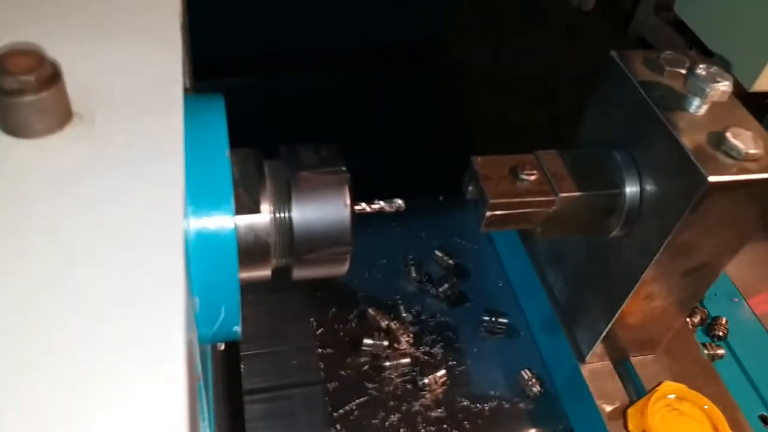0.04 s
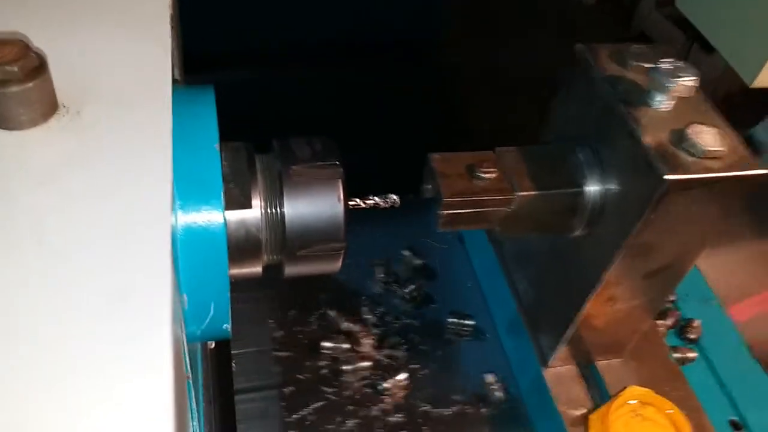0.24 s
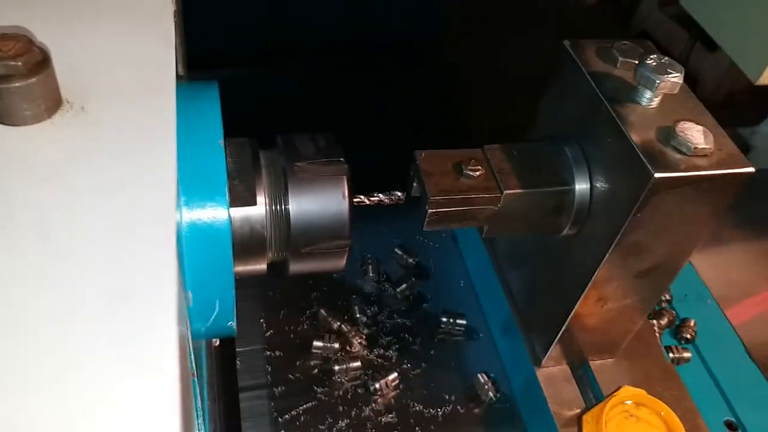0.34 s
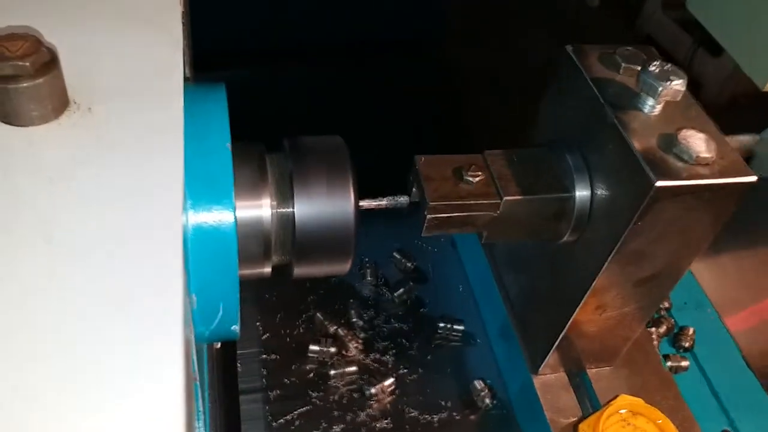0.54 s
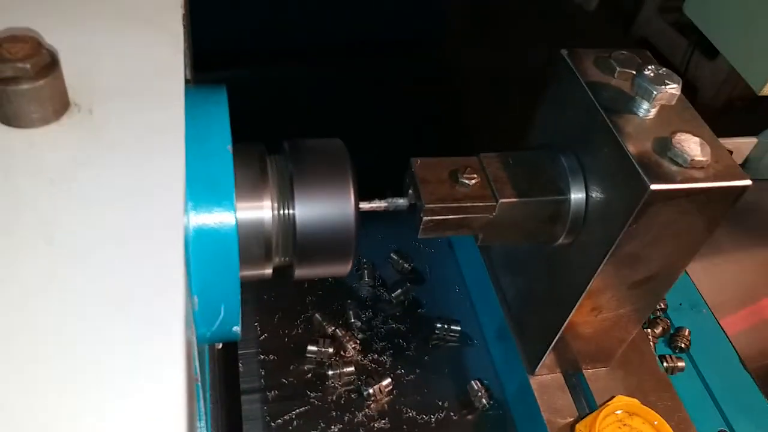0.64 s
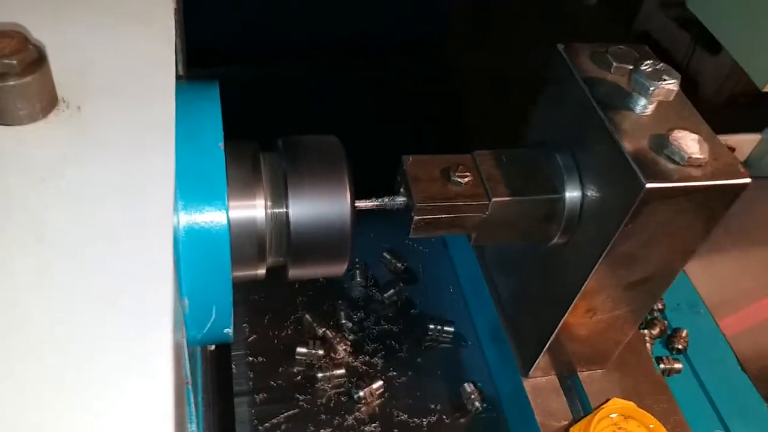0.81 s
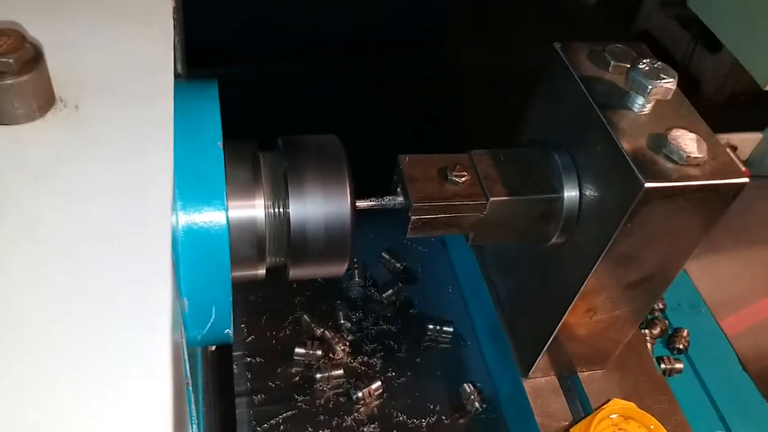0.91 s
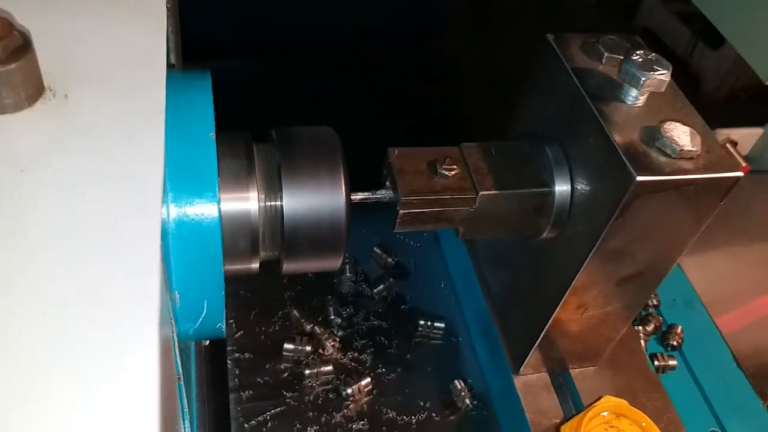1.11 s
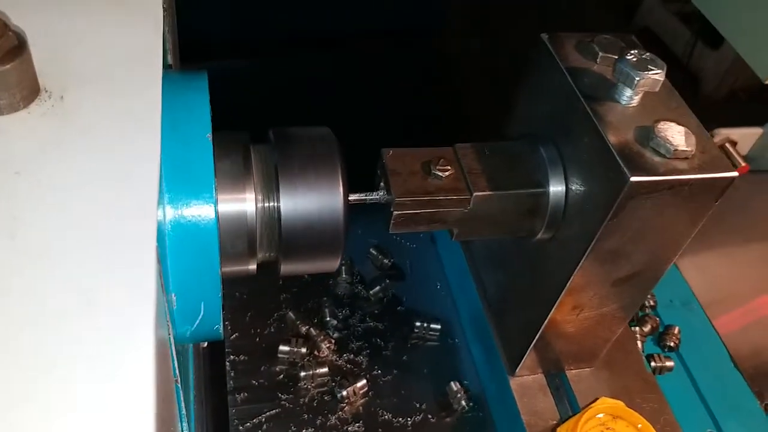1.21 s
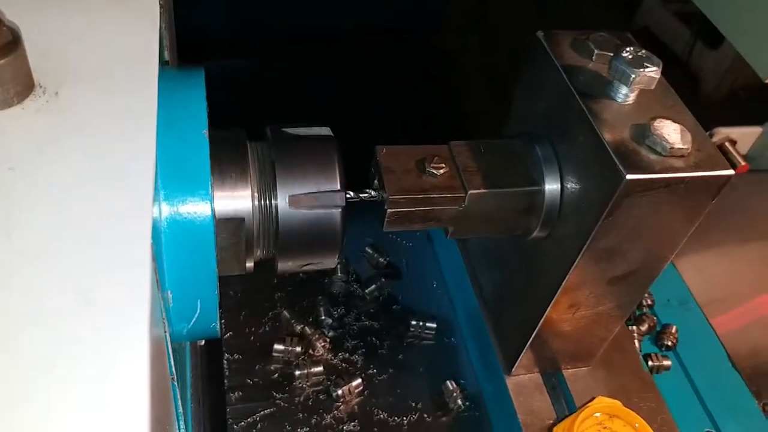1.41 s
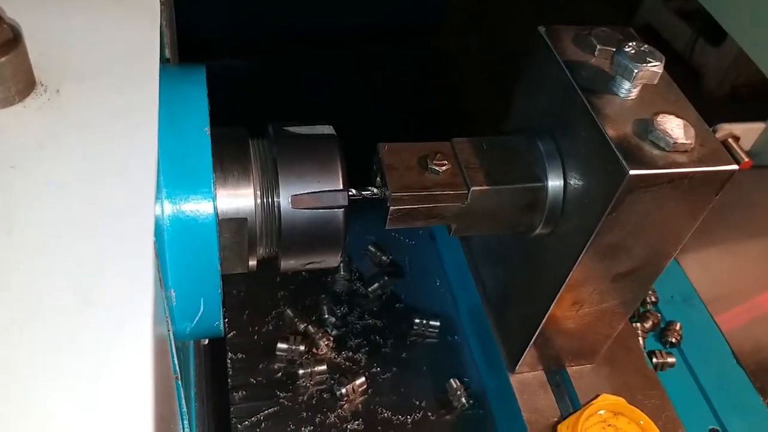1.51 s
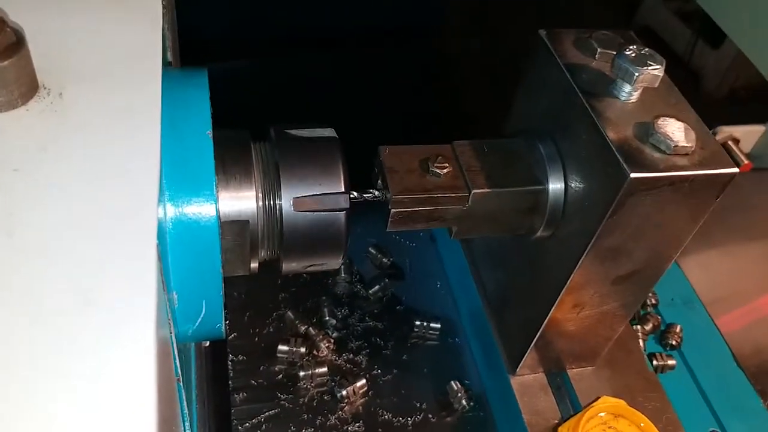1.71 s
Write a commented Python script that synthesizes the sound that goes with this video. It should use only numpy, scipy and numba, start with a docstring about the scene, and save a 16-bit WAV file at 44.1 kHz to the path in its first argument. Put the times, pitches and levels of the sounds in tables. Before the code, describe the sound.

A threading machine's spindle whirs up and brakes after a short motor hum.

```python
"""Tapping machine in a workshop

Close up on a small machine, from a spaced pair of microphones. A stepper motor sings as it slides the
workpiece up to the tap; then the belt-driven spindle spins up, runs for most of a second with a throbbing
tooth tone and brakes. Its servo drive whines on the left; the room rings on over a steady machine hum."""
import sys
import numpy as np
from scipy import signal
from scipy.fft import rfft, irfft
from scipy.io import wavfile
from numba import njit

SR = 44100
rng = np.random.default_rng(int(sys.argv[2]) if len(sys.argv) > 2 else 0)


def master(y):
    """Save y as 16-bit WAV."""
    cut = np.clip(np.atleast_2d(y).T, -1, 1)
    pcm = np.round(cut * 32767)  # scale
    wavfile.write(sys.argv[1], SR, pcm.astype(np.int16))


N = 77175
T = np.arange(N) / SR


def undb(db):
    return 10 ** (np.asarray(db) / 20)


def curve(table, column=1):
    """One column of a table, joined by straight lines in time."""
    rows = np.array(table)
    return np.interp(T, rows[:, 0], rows[:, column])


def unit(x):
    return x / np.sqrt(np.mean(x ** 2))


def swell(at_s, width_s):
    return np.exp(-((T - at_s) / width_s) ** 2)


def gains(table):
    """A (Hz, dB) table as gains on the frequency grid."""
    hz, db = np.array(table).T
    return undb(np.interp(np.log(np.fft.rfftfreq(N, 1 / SR) + 1), np.log(hz), db))


def noise(hz, width_hz):
    """A band of noise with rms 1."""
    band = np.exp(-2 * ((np.fft.rfftfreq(N, 1 / SR) - hz) / width_hz) ** 2)
    return unit(irfft(rfft(rng.standard_normal(N)) * band, N))


def tone(phase, rough, width_hz, flutter_hz=0):
    """A sine whose strength and phase flutter."""
    strength = 1 + rough * noise(flutter_hz, width_hz)
    jitter = rough * noise(flutter_hz, width_hz)
    return np.sqrt(2) * (strength * np.sin(phase) + jitter * np.cos(phase))


def radiate(x, colour, balance):
    """Colour two channels and place each frequency left or right, at rms 1."""
    tilt = np.sqrt(gains(balance))
    return unit(irfft(rfft(x) * gains(colour) * np.array([tilt, 1 / tilt]), N))


def place(x, pan_db, lag_s=0):
    """A source to the left reaches the right microphone later and weaker."""
    return np.array([x * undb(pan_db / 2), np.interp(T - lag_s, T, x) * undb(-pan_db / 2)])


# Stereo width at the pair. Each row: frequency in Hz, gain of the side signal in dB.
PAIR_WIDTH = [(180, -21), (400, -7.5), (900, 1)]

def narrow_bass(x):
    """The image narrows where the waves are long against the microphone spacing."""
    mid = (x[0] + x[1]) / 2
    side = irfft(rfft((x[0] - x[1]) / 2) * gains(PAIR_WIDTH), N)
    return np.array([mid + side, mid - side])


# Room tone all around the microphones. Each row: frequency in Hz, relative level in dB.
SHOP_COLOUR = [(30, -38), (42, -44), (62, -6.5), (130, -8.5), (185, 4.5), (240, -6.5), (400, -3),
               (520, -11), (900, -10), (1300, -14.5), (2000, -18), (3200, -26), (5000, -33), (8000, -39),
               (12000, -48), (15500, -49)]
# Hum, dead centre. Each row: pitch in Hz, level in dB.
SHOP_HUM = [(181, -44), (1392, -55)]

def workshop():
    """Idling fans and motors: a wavering hum in noise whose bass is much the same on both sides."""
    mid, side = rfft(rng.standard_normal((2, N))) * gains(SHOP_COLOUR)
    side = side * gains([(150, -18.5), (400, -10), (1000, -0.5)])
    fans = undb(-36) * unit(irfft(np.array([mid + side, mid - side]), N))
    hum = sum(undb(db) * tone(2 * np.pi * hz * T, rough=0.51, width_hz=23) for hz, db in SHOP_HUM)
    return fans + hum


# The stepper's pace. Each row: time in seconds, step rate in Hz.
STEP_RATE = [(.12, 660), (.15, 690), (.22, 693.7), (.26, 725), (.39, 722.4)]
# Its other partials. Each row: multiple of the step rate, level in dB against the main tone.
STEP_PARTIALS = [(0.601, -22), (2, -23), (2.215, -13.5)]
# The feed from close by. Each row: time in seconds, motor gain in dB, slide gain in dB.
FEED_GAINS = [(.1, -62, -66), (.122, -39, -41.5), (.14, -37, -38), (.18, -27, -38), (.232, -32, -32),
              (.262, -20.5, -32), (.305, -15.5, -23), (.326, -27, -26.5), (.342, -14.5, -24.5),
              (.358, -33, -27.5), (.372, -15, -28.5), (.39, -26.5, -40), (.43, -29.5, -39)]
# The slide's rush before its bass cut. Each row: frequency in Hz, relative level in dB.
RUSH_COLOUR = [(530, -44), (900, -14), (1090, -11.5), (1450, -6.5), (1770, -11), (2050, -13), (3340, -16.5),
               (3540, -27), (3850, -20), (4180, -18), (5440, -22.5), (7320, -23), (15500, -45.5)]
# Where the rush sits. Each row: frequency in Hz, left minus right in dB.
RUSH_BALANCE = [(1300, 1), (2400, -5), (3600, -4), (4400, 8), (5300, 0), (6700, 3), (8400, 14), (11000, -3)]
# The slide's ringing. Each row: pitch and width in Hz, dB against the rush, left minus right in dB.
SLIDE_RINGS = [(257, 42, -14, -3), (426, 130, -14, -3.5), (1395, 220, -7, 9), (2010, 330, -15, -1),
               (2543, 70, -18.5, -6), (3534, 96, -15, -10), (4190, 140, -15, 9.5), (5025, 100, -20.5, 3)]

def feed():
    """The stepper sings at its step rate while the slide squeaks, rushes and rings along its ways."""
    step = 2 * np.pi * np.cumsum(curve(STEP_RATE)) / SR
    motor = tone(step, rough=0.28, width_hz=49)
    motor += sum(undb(db) * tone(k * step, rough=0.37, width_hz=65) for k, db in STEP_PARTIALS)
    # a brief squeak as the slide gathers speed
    squeak = undb(-29) * tone(2 * np.pi * 848 * T, rough=0.22, width_hz=40) * swell(0.247, 0.044)
    singing = place(motor * undb(curve(FEED_GAINS)) + squeak, pan_db=-0.5, lag_s=0.000177)
    grain = undb(-1.5 * noise(200, 820)) * rng.standard_normal((2, N))
    bass_cut = signal.butter(1, 940, "high", fs=SR, output="sos")
    rush = unit(signal.sosfilt(bass_cut, radiate(grain, RUSH_COLOUR, RUSH_BALANCE)))
    ringing = sum(place(undb(db) * noise(hz, width), pan) for hz, width, db, pan in SLIDE_RINGS)
    slide = (rush + ringing) * undb(curve(FEED_GAINS, column=2))
    moving = np.clip((FEED_GAINS[-1][0] - T) / 0.022, 0, 1) * (T > FEED_GAINS[0][0])
    return moving * (singing + slide)


# The servo's whine. Each row: time in seconds, level at the left microphone in dB.
WHINE_LEVEL = [(.43, -69), (.48, -48), (.535, -35.5), (.59, -40.5), (.81, -39), (1.0, -38.5), (1.26, -43.5),
               (1.305, -38.5), (1.4, -40), (1.53, -54), (1.58, -88)]

def drives(servo_hz=8000, upper_hz=12000, pan_db=22):
    """The servo's switching whine has a faint partner a fifth above, where the feed's drive whistles."""
    whine = tone(2 * np.pi * servo_hz * T, rough=0.26, width_hz=100)
    whine += undb(-23) * tone(2 * np.pi * upper_hz * T, rough=0.3, width_hz=80)
    servo = place(whine * undb(curve(WHINE_LEVEL) - pan_db / 2), pan_db)
    whistle = tone(2 * np.pi * upper_hz * T, rough=0.8, width_hz=90, flutter_hz=157)
    return servo + undb(-59.5) * whistle * swell(0.27, 0.14)


# Brief dips of the tooth tone. Each row: time in seconds, depth from 0 to 1.
TOOTH_DIPS = [(.637, 1), (.698, 1), (0.826, 0.5), (0.94, 0.8), (1.009, 0.92), (1.113, 0.76), (1.232, 1),
              (1.35, .65)]

def belt_teeth(tooth_phase):
    """The meshing teeth make a fluttering tone that dips now and then."""
    dips = 1 - sum(depth * swell(at_s, 0.0063) for at_s, depth in TOOTH_DIPS)
    return tone(tooth_phase, rough=0.13, width_hz=50, flutter_hz=33.3) * dips


# The housing's low resonances. Each row: pitch in Hz, width in Hz, relative level in dB.
GROWL_BANDS = [(200.2, 35, -11.5), (257.4, 20, -8.5), (312.7, 16.4, -8), (400, 180, -6), (530, 180, -6.5)]

def housing_growl():
    """The housing resonates in low bands of noise."""
    return sum(undb(db) * noise(hz, width) for hz, width, db in GROWL_BANDS)


# The whirr up close. Each row: frequency in Hz, relative level in dB.
WHIRR_COLOUR = [(40, -45), (90, -12), (180, -6.5), (290, -10.5), (420, -4.5), (560, 9.5), (680, -5),
                (860, -8.5), (1050, -4), (1170, -7.5), (1320, -5), (1700, -10), (2500, -16.5),
                (3500, -16.5), (4400, -12.5), (5200, -20), (7000, -25.5), (8300, -25.5), (10500, -32),
                (12500, -34), (15500, -44)]
# Where it sits before the bass is narrowed. Each row: frequency in Hz, left minus right in dB.
WHIRR_BALANCE = [(300, 4), (1300, 6), (2000, 8), (2700, -6.5), (3500, -0.5), (4500, 8.5), (6800, 2.5),
                 (8500, 10.5), (10000, 14), (11700, -3), (14000, 7.5)]

def belt_whirr(turn, tooth_phase):
    """Belt and bearing noise, chopped by the teeth, flickers and swells twice a turn."""
    chop = np.exp(0.45 * np.cos(tooth_phase))
    flicker = undb(1.3 * noise(22, 80) - 0.5 * np.cos(2 * turn))
    return narrow_bass(radiate(chop * flicker * rng.standard_normal((2, N)), WHIRR_COLOUR, WHIRR_BALANCE))


# The spindle's weaker tones. Each entry: cycles per turn.
ORDERS = [5, 11, 15, 18, 23, 28, 32, 33, 58, 60, 61, 74, 75, 87, 90]
# Their strengths, in the same order. Each entry: base level in dB.
ORDER_LEVELS = [-56, -45.5, -44.5, -46, -37.5, -70, -32, -35, -35.5, -36.5, -42, -40.5, -41.5, -70, -39.5]
# The rasp. Each row: time in seconds, gain in dB on the highest tones and the housing's rings.
RASP_GAIN = [(.55, 5.5), (.63, 9.5), (.7, -16), (.9, -6), (1.0, 8.5), (1.09, 1), (1.15, -1), (1.28, 7.5),
             (1.4, 1)]
# The housing's rings. Each row: pitch in Hz, width in Hz, base level in dB.
HOUSING_RINGS = [(1030, 70, -38), (1308, 45, -34)]

def spindle_rasp(turn, rasp_above_order=70):
    """Rough tones follow the rotation; the highest swell into a rasp, and the housing rings with them."""
    rasp_db = curve(RASP_GAIN)
    tones = sum(undb(db + rasp_db * (k > rasp_above_order)) * tone(k * turn, rough=0.57, width_hz=22)
                for k, db in zip(ORDERS, ORDER_LEVELS))
    housing = sum(undb(db + rasp_db) * noise(hz, width) for hz, width, db in HOUSING_RINGS)
    return tones + housing


# Spin-up, run and braking. Each row: time in seconds, share of full speed.
SPINDLE_SPEED = [(.485, 0.35), (.505, .45), (.52, .5), (.548, .74), (.585, .88), (.63, 1), (1.36, 1),
                 (1.388, .84), (1.408, 0.52), (1.44, 0.51), (1.48, 0.37)]
# The spindle from close by. Each row: time in seconds, then gains in dB of tooth tone, whirr and growl.
SPINDLE_GAINS = [(.48, -41, -42, -44), (.502, -14.5, -41.5, -35), (.53, -23, -26.5, -17.5),
                 (.555, -20.5, -24.5, -21), (.6, -23.5, -19, -27), (.645, -16, -25, -55),
                 (.68, -11.5, -24, -37), (.9, -14, -23, -29.5), (1.1, -13.5, -24, -33.5),
                 (1.31, -13.5, -22.5, -37), (1.37, -17.5, -24.5, -24), (1.415, -23, -30, -14.5),
                 (1.46, -31, -41, -21), (1.52, -36, -42.5, -50)]

def spindle(full_speed_hz=17.5, teeth=30, belt_hz=9.3):
    """Just left of centre, the spindle surges with the belt's loop and growls on starting and braking."""
    turn = 2 * np.pi * np.cumsum(full_speed_hz * curve(SPINDLE_SPEED)) / SR
    surge = np.cos(2 * np.pi * belt_hz * (T - 0.985))
    mesh = belt_teeth(teeth * turn) * undb(curve(SPINDLE_GAINS) + 1.05 * surge)
    growl = housing_growl() * undb(curve(SPINDLE_GAINS, column=3))
    whirr = belt_whirr(turn, teeth * turn) * undb(curve(SPINDLE_GAINS, column=2) + 0.8 * surge)
    running = np.clip(np.minimum(T - 0.518, 1.415 - T) / 0.032, 0, 1)
    tones = place(mesh + running * spindle_rasp(turn), pan_db=2.5, lag_s=0.00026)
    sounding = (T > SPINDLE_GAINS[0][0]) & (T < SPINDLE_GAINS[-1][0])
    return sounding * (tones + growl + whirr)


@njit
def walls(x, lags, gain, damp):
    """Eight delay lines that feed each other, duller on every round."""
    line, soft, out = np.zeros((8, 4096)), np.zeros(8), np.zeros(x.shape)
    for i in range(x.shape[1]):
        total = 0.
        for k in range(8):
            soft[k] += (1 - damp) * (gain[k] * line[k, (i - lags[k]) & 4095] - soft[k])
            total += soft[k]
            out[k % 2, i] += soft[k]
        for k in range(8):
            line[k, i & 4095] = x[k // 4, i] + soft[k] - total / 4
    return out


# Paths between the workshop's walls. Each entry: delay in samples.
WALL_LAGS = [331, 479, 613, 797, 1021, 1259, 1543, 1871]

def room(machine, bass_t60_s=0.81, damp=0.42):
    """The walls return the machine's sound to the microphones, the treble dying first."""
    lags = np.array(WALL_LAGS)
    round_gain = undb(-60 * lags / SR / bass_t60_s)
    return narrow_bass(walls(machine, lags, round_gain, damp))


def scene():
    """The machine stands close to the pair, with the workshop behind it."""
    machine = feed() + spindle()
    return workshop() + machine + drives() + undb(-17.5) * room(machine)


def record(dry, top_hz=15700):
    """The recorder cuts the top."""
    return signal.sosfilt(signal.ellip(10, .2, 80, top_hz, fs=SR, output="sos"), dry)


dry = scene()
out = record(dry)
master(out)
```